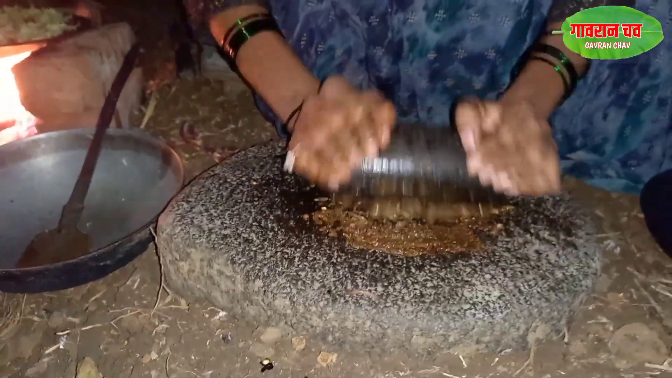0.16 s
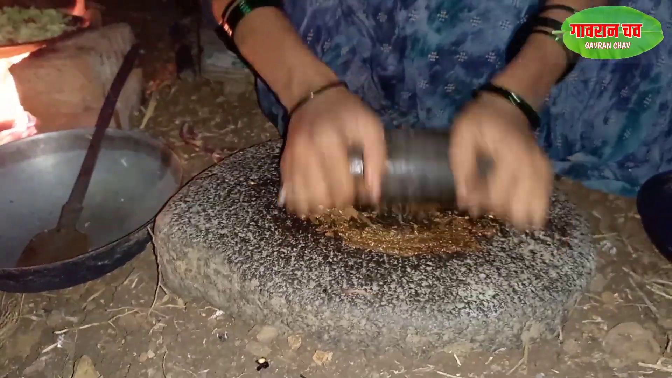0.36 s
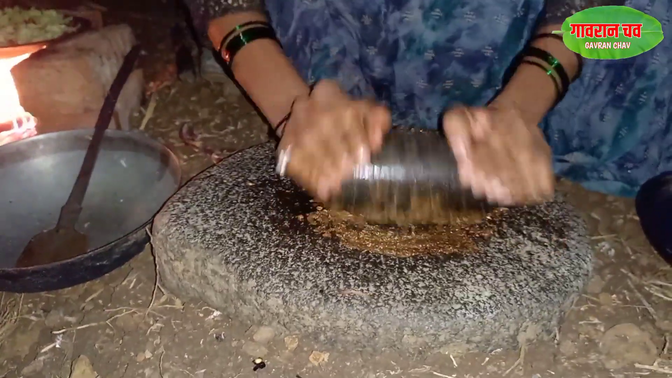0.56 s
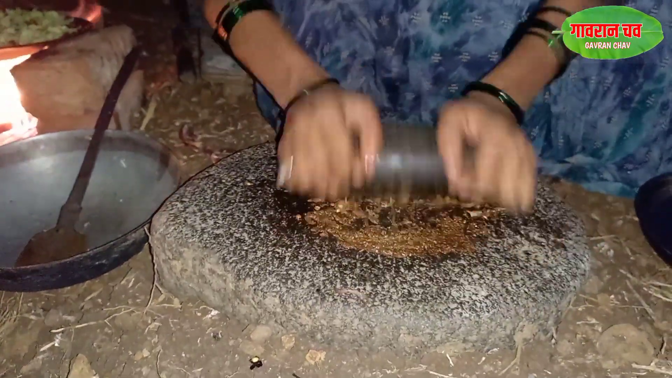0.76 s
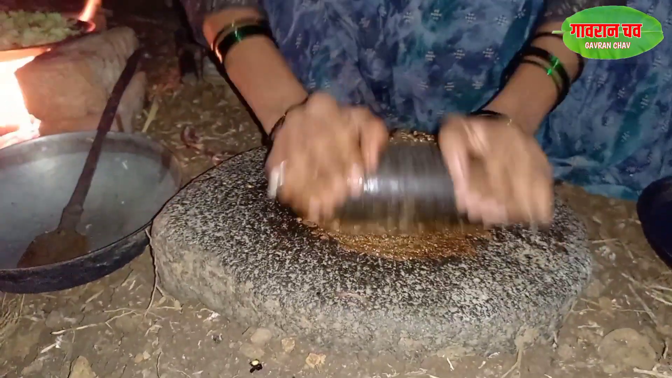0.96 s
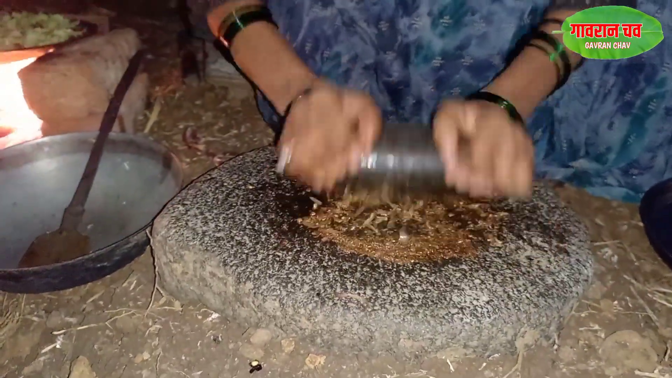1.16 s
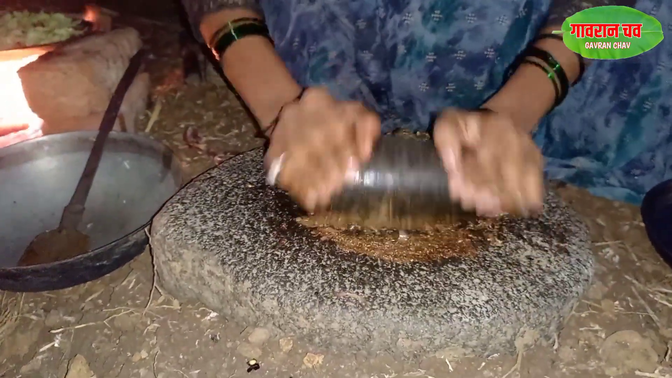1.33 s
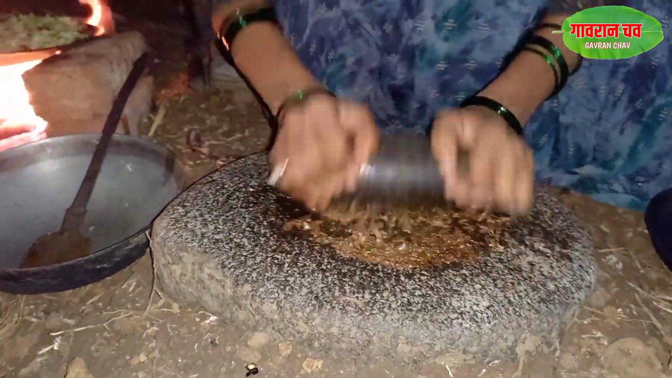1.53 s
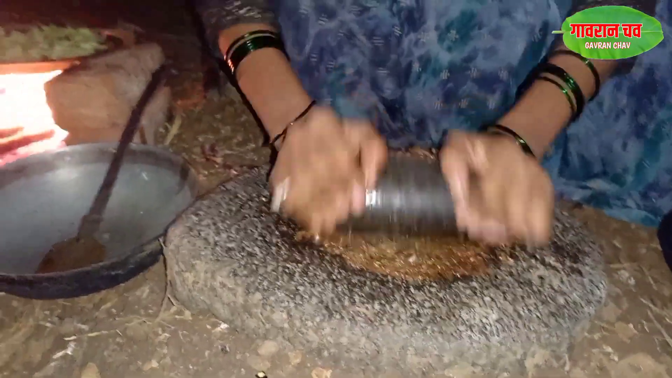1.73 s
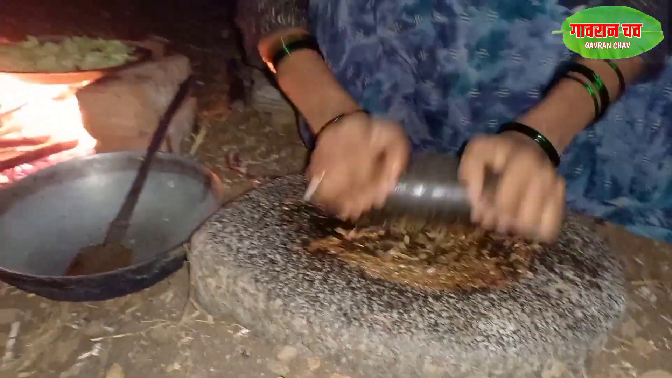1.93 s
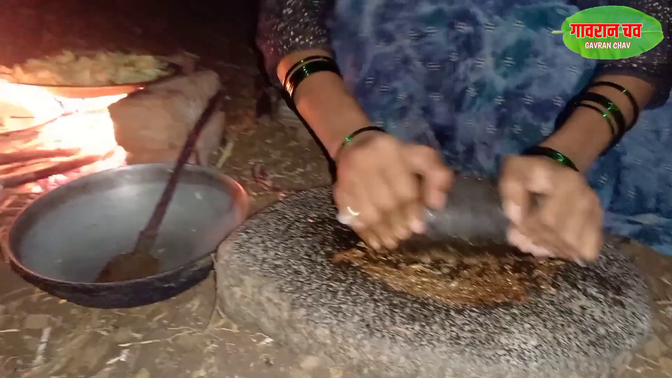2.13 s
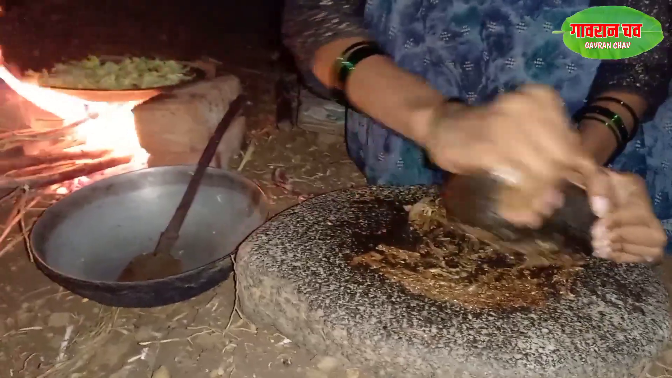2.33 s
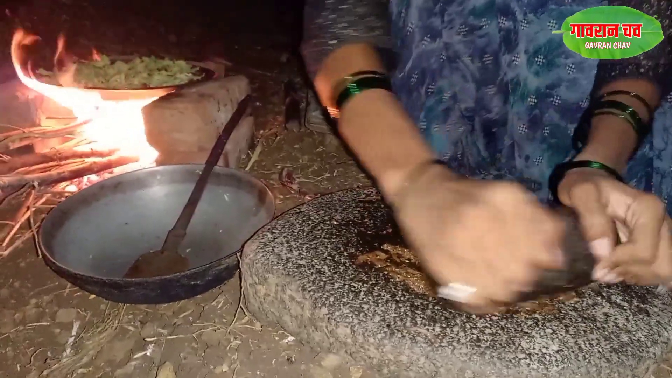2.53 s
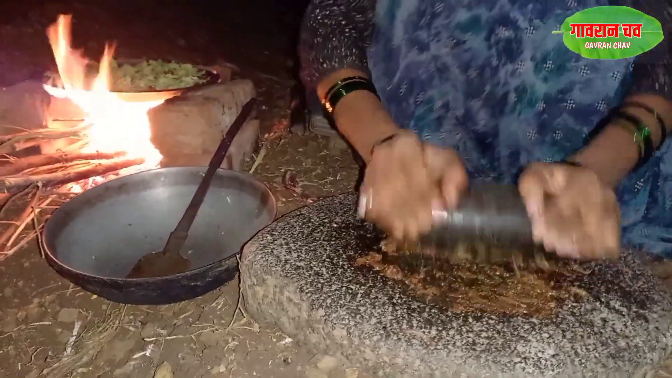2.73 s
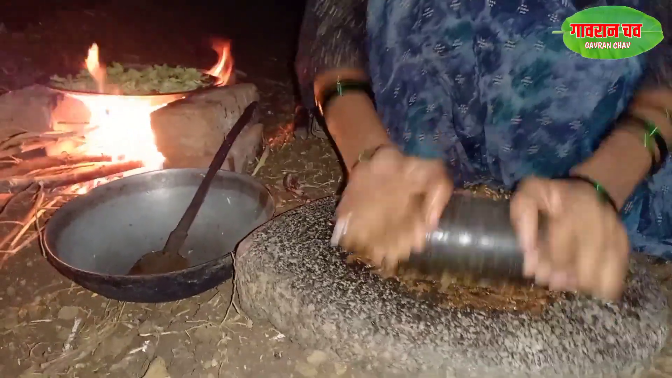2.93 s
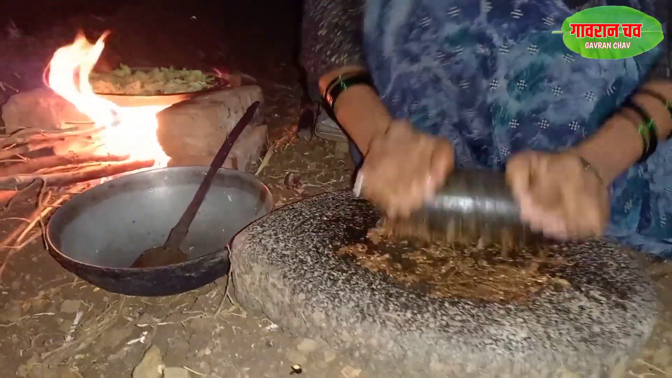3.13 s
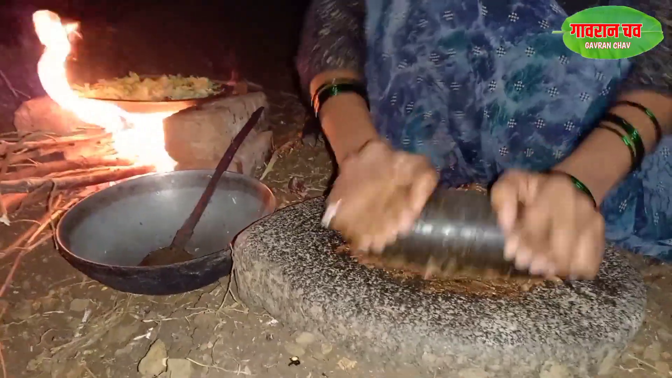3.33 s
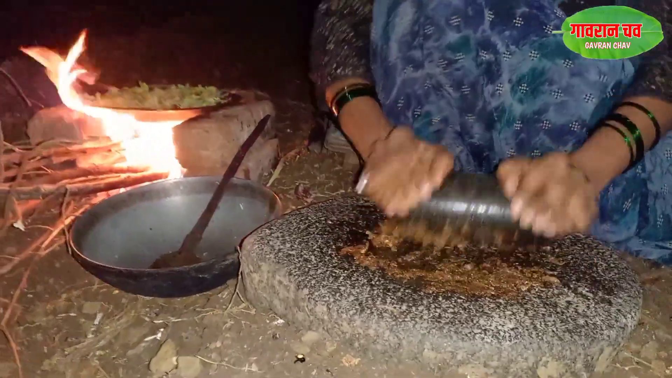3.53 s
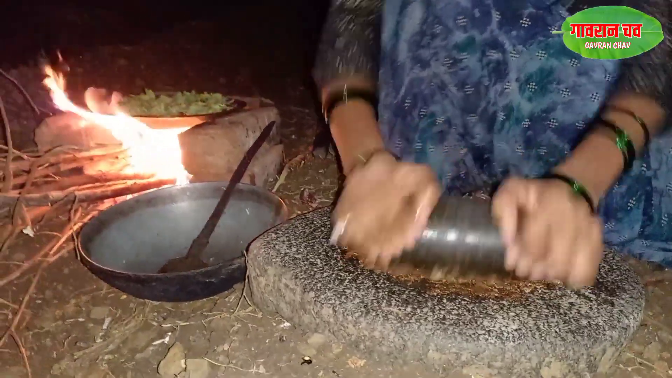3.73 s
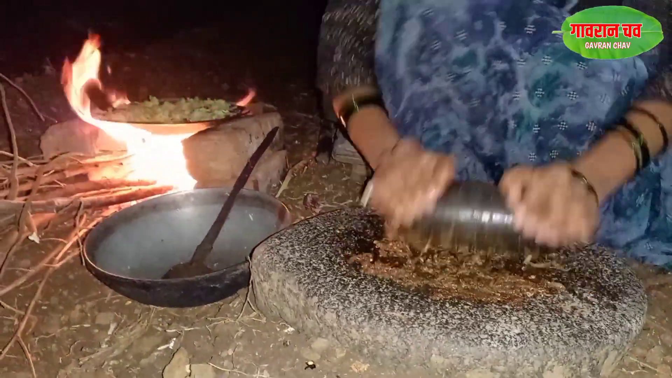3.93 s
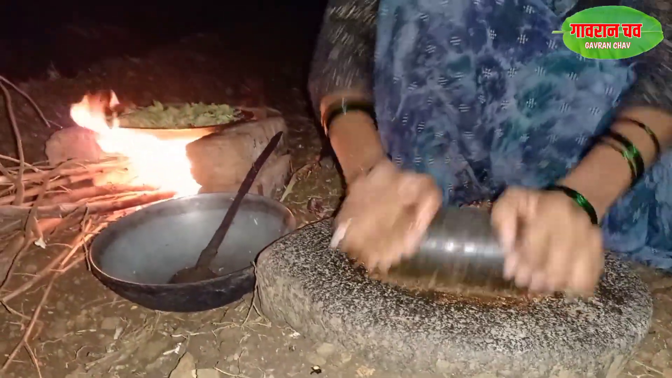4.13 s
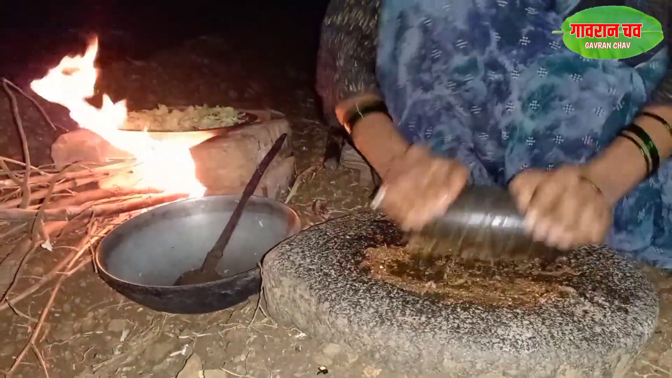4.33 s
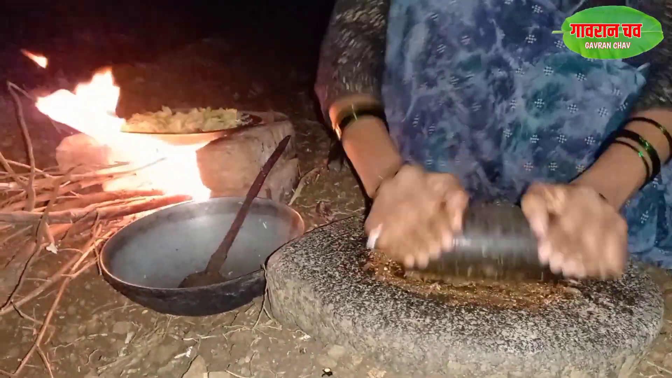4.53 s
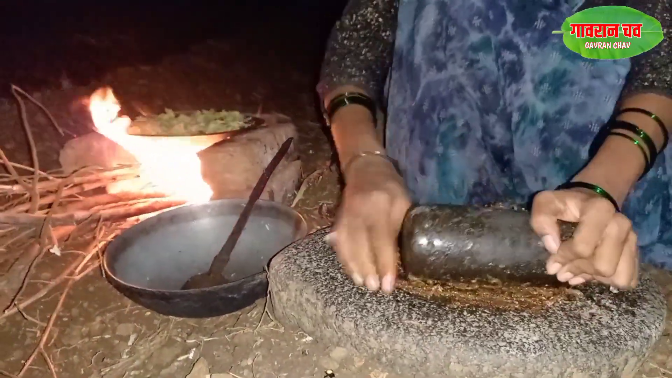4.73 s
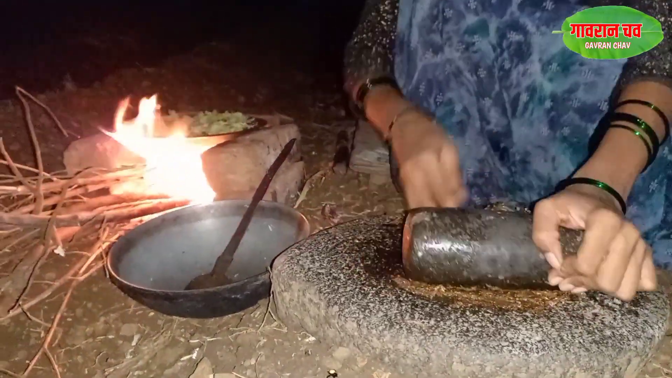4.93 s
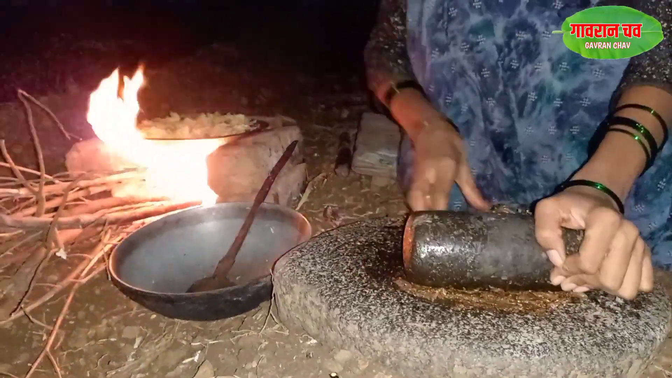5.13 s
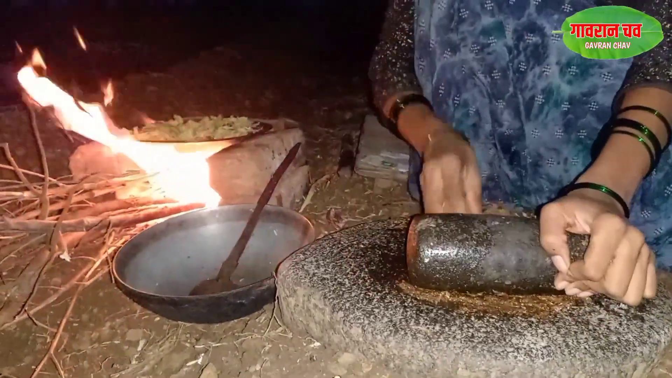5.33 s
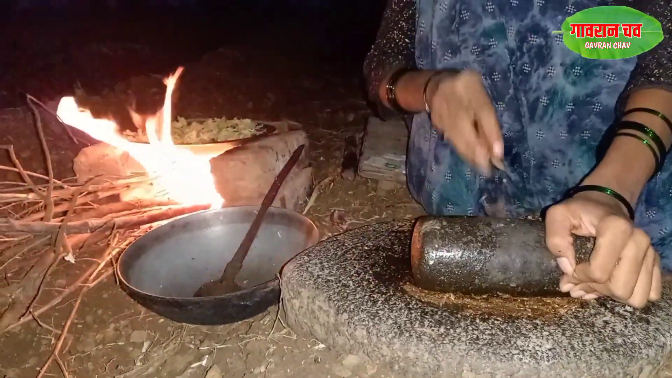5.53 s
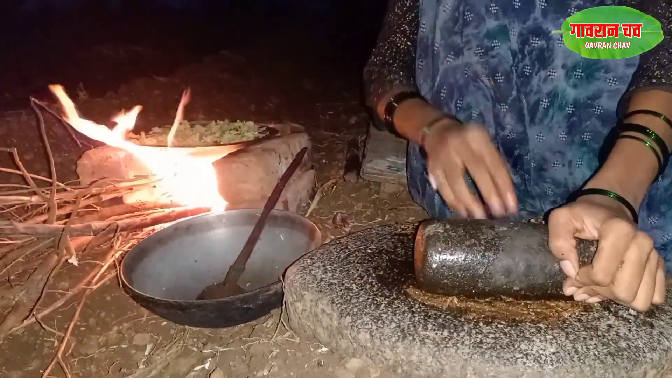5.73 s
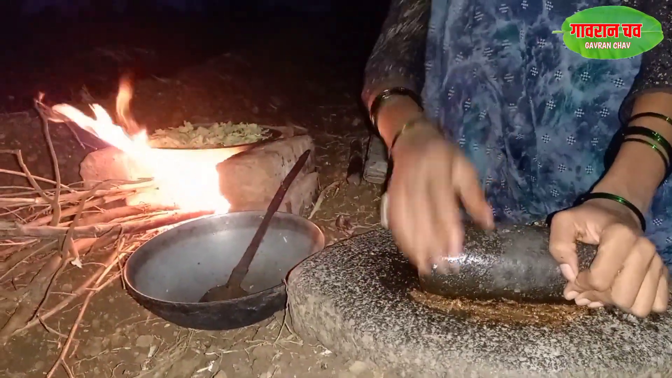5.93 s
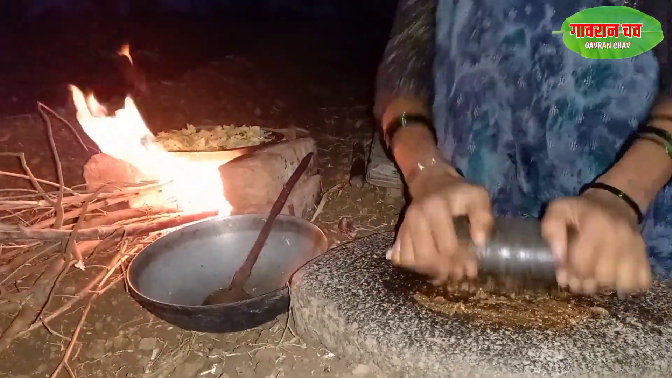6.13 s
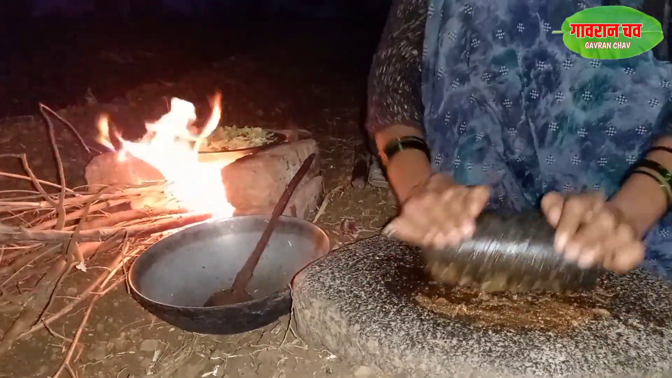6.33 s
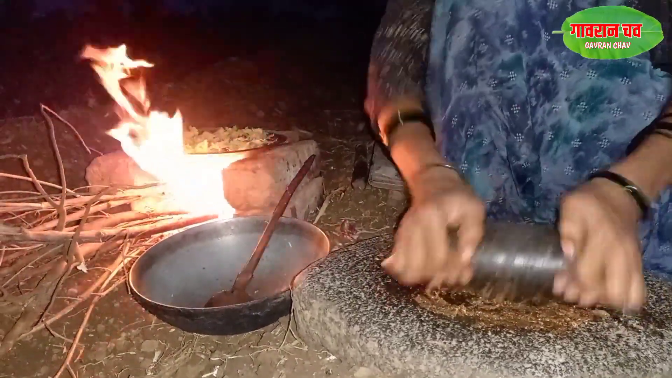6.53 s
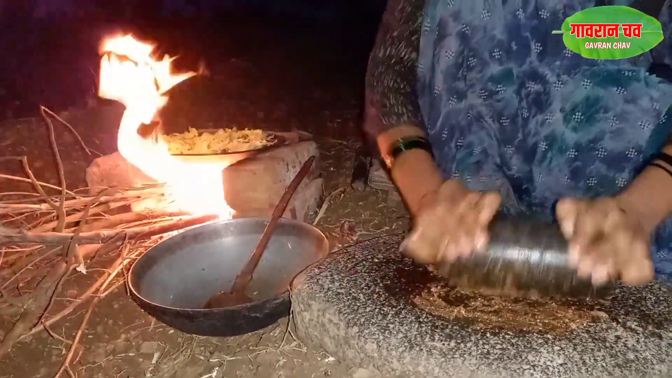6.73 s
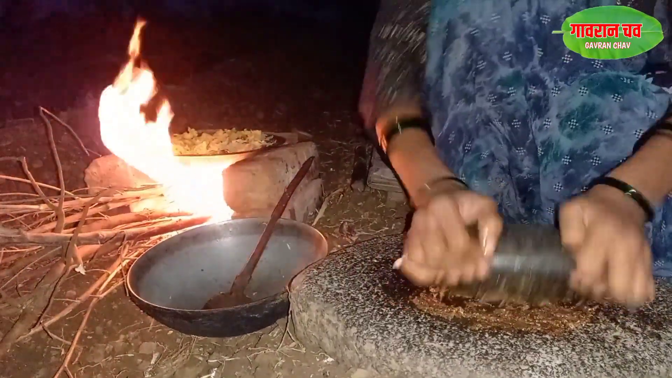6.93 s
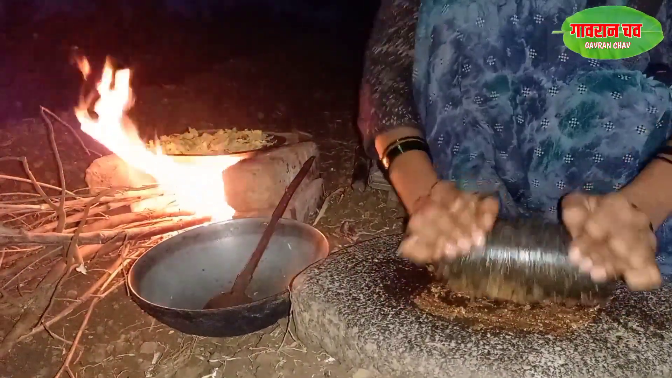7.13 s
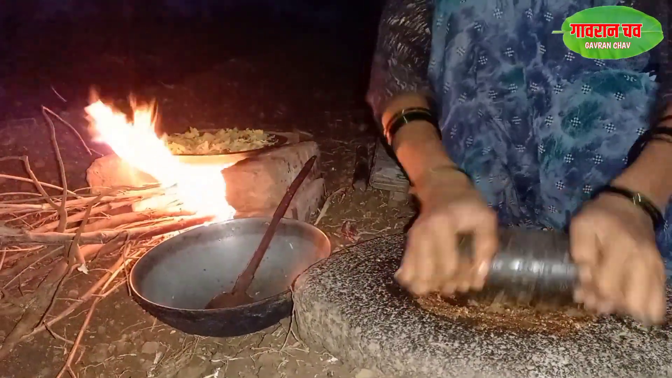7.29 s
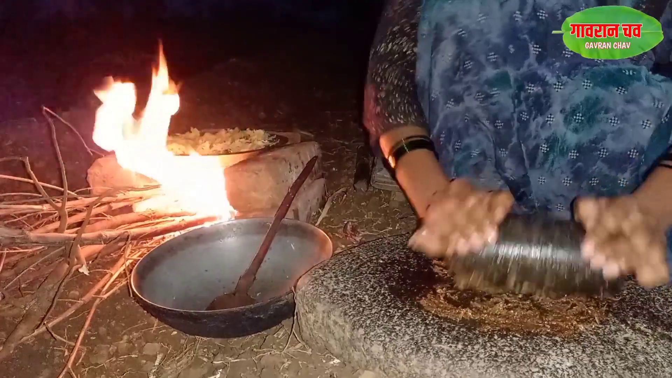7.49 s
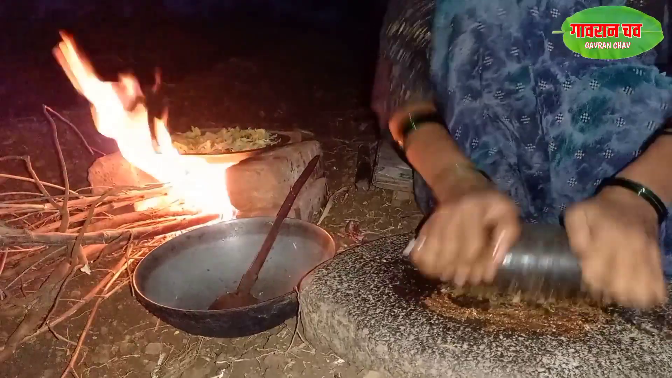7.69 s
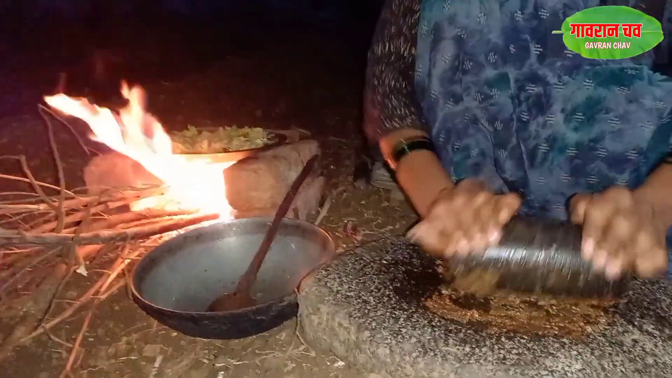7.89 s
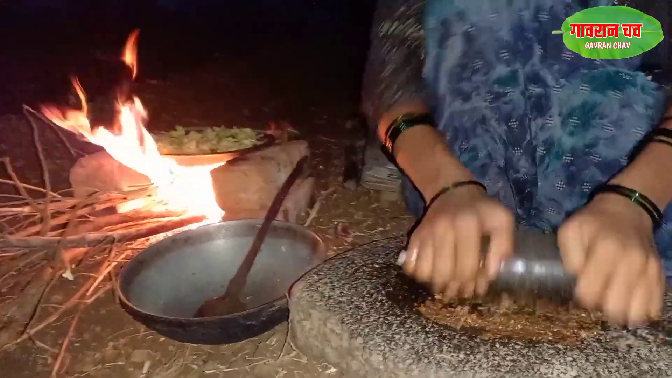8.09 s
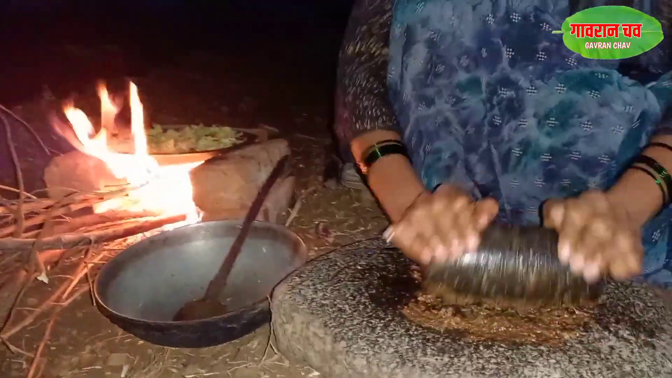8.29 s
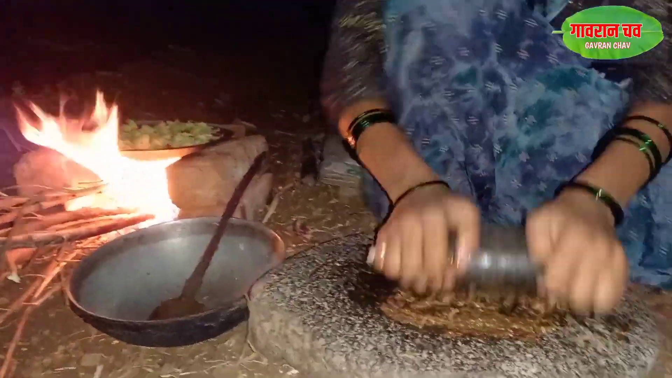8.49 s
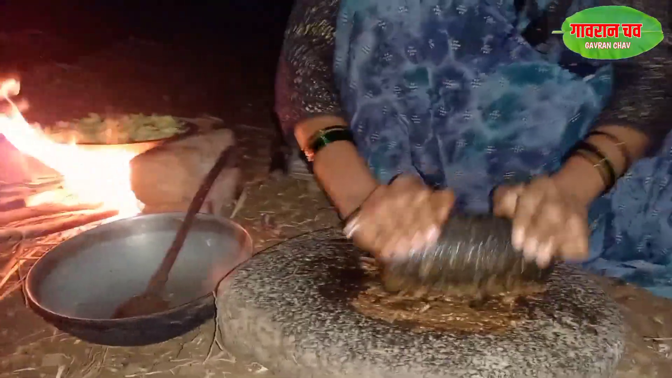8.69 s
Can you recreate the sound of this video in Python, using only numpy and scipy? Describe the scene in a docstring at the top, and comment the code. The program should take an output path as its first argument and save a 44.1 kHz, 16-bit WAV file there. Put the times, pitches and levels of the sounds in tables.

```python
"""Outdoors at night, close microphones: a stone roller is pushed and drawn over spices on a stone slab.
From the start grit crunches with each stroke, dry at first, wetter later, dry again in the last stroke.
Seeds crack, the stones drag, glass bangles clink, a draught buffets the microphones and a fire ticks.
At 2.4 s the roller knocks and is then swivelled. Near 5 s it rests while fingers sweep up the paste;
after 6 s the grinding goes on. Grit is clumped noise bursts, drag and wind filtered noise, bangles sines."""
import sys
import numpy as np
from scipy import signal
from scipy.fft import rfft, irfft, next_fast_len
from scipy.io import wavfile
from scipy.ndimage import uniform_filter1d

SR = 44100
rng = np.random.default_rng(int(sys.argv[2]) if len(sys.argv) > 2 else 0)


def store_pcm(level_fs):
    """Save levels as 16-bit WAV."""
    pcm = np.round(np.clip(level_fs, -1, 1) * 32767).astype(np.int16)
    wavfile.write(sys.argv[1], SR, np.atleast_2d(pcm).T)


N = 385875
TIME = np.arange(N) / SR


def from_db(db):
    """Decibels to gain."""
    return 10 ** (np.asarray(db) / 20)


def rms_one(x):
    """Scale to unit power."""
    return x / np.sqrt(np.mean(x ** 2) + 1e-20)


def in_time(rows):
    """Each column of a curve at every sample."""
    s, *columns = np.transpose(rows)
    return [np.interp(TIME, s, column) for column in columns]


def drift(rate):
    """Slow random curve of spread 1 with `rate` new values a second."""
    values = rng.standard_normal(9000)
    # straight lines between the values lose a third of their power
    return np.interp(TIME * rate, np.arange(9000), values) * np.sqrt(3 / 2)


def swell(s, rise_s, fall_s):
    """One movement or gust, 0-1: a quarter sine up to its top and another back to rest."""
    start, end = np.searchsorted(TIME, [s - rise_s, s + fall_s])
    out, t = np.zeros(N), TIME[start:end] - s
    quarter_s = np.where(t < 0, rise_s, fall_s)
    out[start:end] = np.maximum(np.cos(np.pi / 2 * t / quarter_s), 0)
    return out


def swells(rows):
    """Gain over time of a table of movements."""
    return sum(from_db(db) * swell(s, rise_s, fall_s) for s, rise_s, fall_s, db in rows)


def colour(x, points, share=1):
    """Causal (minimum-phase) filter through a share of the dB values of a spectrum."""
    size = next_fast_len(N + 8192, True)
    hz, db = np.transpose(points)
    grid = np.maximum(np.fft.rfftfreq(8192, 1 / SR), 1)
    curve_db = share * np.interp(np.log(grid), np.log(hz), db)
    cepstrum = irfft(np.log(from_db(curve_db)))
    # folding the cepstrum onto positive time makes the phase minimal
    half = len(cepstrum) // 2
    cepstrum[1:half] *= 2
    cepstrum[half + 1:] = 0
    impulse = irfft(np.exp(rfft(cepstrum)))
    return irfft(rfft(x, size) * rfft(impulse, size), size)[..., :N]


def stereo_noise(alike, size=N):
    """White noise with a given likeness (correlation) of left and right."""
    mid, side = rng.standard_normal((2, size))
    return np.sqrt((1 + alike) / 2) * mid + np.sqrt((1 - alike) / 2) * side * [[1], [-1]]


def add(out, s, sound):
    """Mix a short sound in at a time."""
    start = max(round(s * SR), 0)
    part = sound[..., :max(N - start, 0)]
    out[..., start:start + part.shape[-1]] += part


def snap(t60, scatter_db, scatter_t60, alike):
    """One fracture: a very short burst, then its scatter off hands, slab and ground; unit energy."""
    t = TIME[:2048]
    decay = from_db(-60 * t / t60) + from_db(scatter_db - 60 * t / scatter_t60)
    burst = stereo_noise(alike, size=len(t)) * decay
    return burst / np.sqrt(np.sum(burst ** 2, axis=1, keepdims=True))


def grains(per_s, size_db, clump_db, snaps):
    """Grains of very uneven size break in clumps; each sounds one of the snaps."""
    at = np.flatnonzero(rng.random(N) < per_s / SR)
    level_db = size_db * np.minimum(rng.exponential(1, N), 4.5) + clump_db * drift(130)
    sizes = from_db(level_db) * rng.choice([-1, 1], N)
    kind = rng.integers(0, len(snaps), N)
    clicks = np.zeros((len(snaps), 1, N))
    clicks[kind[at], 0, at] = sizes[at]
    return sum(signal.oaconvolve(train, sound, axes=1)[:, :N] for train, sound in zip(clicks, snaps))


def grit(per_s, size_db, clump_db, t60, scatter_db, alike, count=8):
    """Broad, pitchless fractures."""
    fractures = [snap(t60, scatter_db, 0.078, alike) for _ in range(count)]
    return grains(per_s, size_db, clump_db, fractures)


def grinding():
    """Fine and coarse grit crunch under the roller while the stones drag on each other."""
    # how wet the spice under the roller is: [t/s, wetness 0-1]
    wetness = [(1.7, 0.01), (2.6, 0.18), (6.2, 0.8), (8.3, 0.9), (8.75, 0.15)]
    # colour of the fine crunch: [f/Hz, density level/dB]
    fine_colour = [(3000, -29.5), (5000, -10.5), (6200, -5.5), (7300, 1), (8100, -2), (9000, -1.5),
                   (10300, -1), (12000, -0.5), (13200, -2), (15300, -2.5), (16300, -82.5)]
    # colours of the rasp over dry and wet spice: [f/Hz, density level/dB]
    dry_colour = [(700, -31), (980, -13.5), (1130, -22), (1290, -14.5), (1370, -10), (1560, -19),
                  (1940, -11), (2200, -13), (2700, -12.5), (3500, -6.5), (4500, -1.5), (5500, -1),
                  (6500, -1), (9000, -24.5)]
    wet_colour = [(900, -20.5), (1430, -12), (1700, -11), (2200, -13), (2700, -2), (3090, -2), (3350, 1.5),
                  (3700, 0), (4300, 3), (5070, 2), (5900, 0.5), (9000, -32.5)]
    # colour of stone dragging on stone: [f/Hz, density level/dB]
    stone_colour = [(45, -19), (90, 10), (170, 18.5), (250, 12.5), (350, 6), (500, 0.5), (650, -0.5),
                    (800, -8.5), (1050, -6), (1700, -19.5), (2600, -3), (4500, -47)]

    crunch_gain, rasp_gain, drag_gain = stroke_gains()
    wet = in_time(wetness)[0]
    fine = grit(per_s=5000, size_db=4.0, clump_db=3.0, t60=0.0012, scatter_db=-21.5, alike=0.056)
    fine = rms_one(colour(fine, fine_colour))
    lumps = rms_one(grit(per_s=2400, size_db=2.0, clump_db=2.0, t60=0.0029, scatter_db=-16, alike=0.14))
    husks = rms_one(pips(per_s=500, size_db=4.0, cycles=110, low_hz=2636, high_hz=5950))
    lumps += from_db(-11.5) * husks
    # the rasp sounds in the colour of dry spice, shifting to that of wet spice as the wetness grows
    dry_rasp = from_db(0.98) * rms_one(colour(lumps, dry_colour))
    wet_rasp = rms_one(colour(lumps, wet_colour))
    coarse = np.sqrt(1 - wet) * dry_rasp + np.sqrt(wet) * wet_rasp
    drag = rms_one(colour(stereo_noise(alike=0.88), stone_colour) * from_db(2.4 * drift(70)))
    crunch = fine * crunch_gain * from_db(-2.5)
    rasp = coarse * rasp_gain * from_db(-5.0)
    return crunch + rasp + drag * drag_gain * from_db(6)


def stroke_gains(uneven_db=1.0):
    """Gains of crunch, rasp and drag: each follows the roller's speed over an uneven, lumpy bed of spice."""
    # pushed away, weight on the roller; levels ahead of the layer trims:
    # [fastest t/s, speeding up/s, slowing down/s, fine crunch level/dB, coarse rasp level/dB, drag level/dB]
    pushes = [(.24, 0.087, .15, -35, -31, -55), (.65, 0.088, 0.11, -38, -34, -54.5),
              (1.025, 0.084, 0.11, -39.5, -33, -51), (1.41, .09, 0.13, -37.5, -35, -51.5),
              (1.805, 0.086, .12, -36.5, -36, -49), (2.189, 0.093, 0.076, -42.5, -45.5, -56.5),
              (3.0, .11, 0.094, -41, -44.5, -49), (3.39, 0.12, 0.1, -40.5, -43, -50),
              (3.785, 0.091, 0.13, -41, -47, -50), (4.187, 0.11, 0.12, -41.5, -48, -50.5),
              (4.585, .10, 0.11, -42, -50.5, -51.5), (6.44, 0.1, 0.069, -33, -42.5, -59.5),
              (6.827, 0.059, .115, -40, -43, -53), (7.244, 0.11, 0.12, -39.5, -46.5, -51.5),
              (7.627, 0.13, 0.1, -40, -47.5, -53.5), (8.012, 0.12, 0.12, -42.5, -48, -53),
              (8.40, 0.098, 0.13, -44, -45, -53.5), (8.77, 0.084, .1, -38.5, -38, -44)]
    # drawn back, lightly: same columns
    pulls = [(0.131, 0.046, 0.039, -38.5, -35.5, -64), (0.511, 0.17, 0.11, -44, -37.5, -74),
             (0.891, 0.097, 0.066, -39.5, -36, -81), (1.266, .15, 0.083, -43.5, -37.5, -64.5),
             (1.632, 0.079, 0.14, -38.5, -37, -58.5), (2.03, 0.16, 0.08, -41, -40, -70),
             (2.6, 0.086, 0.18, -43.5, -60, -73), (2.792, 0.12, .12, -38, -42, -73),
             (3.21, 0.1, 0.099, -37.5, -42, -61), (3.605, 0.096, 0.093, -38.5, -46.5, -58),
             (4.004, 0.13, 0.12, -42, -46.5, -61.5), (4.42, 0.1, 0.078, -38, -47.5, -63),
             (6.275, 0.094, 0.14, -42, -48, -78), (6.676, 0.096, 0.16, -45, -46.5, -79),
             (7.08, .08, 0.079, -41.5, -48, -65), (7.44, 0.09, 0.11, -38, -43, -67),
             (7.84, 0.11, 0.1, -43.5, -49.5, -71), (8.216, 0.077, 0.16, -42, -46.5, -62.5),
             (8.626, 0.089, 0.13, -40, -42, -63)]
    # weight left on the roller between strokes, as stirring grit: [t/s, level/dB]
    contact_curve = [(0, -49.5), (1.0, -50), (2.28, -55), (2.42, -72), (2.5, -57), (2.9, -52), (3.6, -54.5),
                     (4.64, -55), (4.77, -71), (4.9, -59.5), (5.13, -75), (5.85, -81), (6.1, -71.5),
                     (6.27, -52), (6.56, -55.5), (7.7, -57), (8.75, -53)]
    # lumps of spice collapse in a short crunch: [t/s, fine crunch level/dB, coarse rasp level/dB]
    lump_falls = [(.015, -44, -54), (0.116, -44, -42), (0.214, -37, -35), (.42, -51, -59),
                  (.622, -31, -31.5), (0.778, -43, -43.5), (1.295, -37, -40), (1.66, -51, -32.5),
                  (1.945, -49, -43.5), (2.028, -42, -36.5), (2.26, -48, -62), (2.46, -55.5, -79),
                  (2.665, -40.5, -61), (3.939, -46, -45), (4.336, -39.5, -52), (4.425, -39, -48.5),
                  (6.425, -30.5, -50), (6.51, -49, -45.5), (6.79, -36, -45), (7.07, -40, -47),
                  (7.655, -39.5, -50.5), (7.841, -41, -58), (8.163, -46, -45.5), (8.535, -43, -58)]
    # exponents: how steeply each layer grows with the roller's speed
    crunch_growth, rasp_growth, drag_growth = 1.63, 1.5, 3
    contact_rasp_db, contact_drag_db = -7.5, -18.5  # relative to the stirring grit
    rest_drag_db = -84  # the hand never holds the roller quite still
    lump_rise_s, lump_fall_s = 0.012, 0.032

    # powers add, so the layers are summed as squares
    contact = from_db(in_time(contact_curve)[0])
    crunch = contact ** 2
    rasp = (contact * from_db(contact_rasp_db)) ** 2
    drag = (contact * from_db(contact_drag_db)) ** 2 + from_db(rest_drag_db) ** 2
    for s, rise_s, fall_s, crunch_db, rasp_db, drag_db in pushes + pulls:
        speed = swell(s, rise_s, fall_s)
        on = speed > 0
        crunch[on] += (from_db(crunch_db) * speed[on] ** crunch_growth) ** 2
        rasp[on] += (from_db(rasp_db) * speed[on] ** rasp_growth) ** 2
        drag[on] += (from_db(drag_db) * speed[on] ** drag_growth) ** 2
    for s, crunch_db, rasp_db in lump_falls:
        collapse = swell(s, lump_rise_s, lump_fall_s) ** 2
        crunch += (from_db(crunch_db) * collapse) ** 2
        rasp += (from_db(rasp_db) * collapse) ** 2
    bed = from_db(uneven_db * drift(45))
    return bed * np.sqrt(crunch), bed * np.sqrt(rasp), np.sqrt(drag)


def pips(per_s, size_db, cycles, low_hz, high_hz, count=12):
    """Husks squeezed out from under the roller ring briefly, each at one of a row of pitches."""
    t = TIME[:512]
    rings = []
    for hz in np.geomspace(low_hz, high_hz, count):
        decay = from_db(-60 * hz * t / cycles)  # a rate of 60 dB in so many cycles
        rings.append(decay * np.sin(2 * np.pi * (hz * t + rng.random((2, 1)))))
    return grains(per_s, size_db, 2.2, rings)


def cracks(onset_s=0.0011):
    """Whole seeds burst with a bright snap."""
    # single seeds, loud and faint; each sounds onset_s later: [t/s, level/dB ahead of gain and colour]
    seeds = [(0.2105, -9), (0.2604, -13), (0.5917, -9), (0.7614, -20), (0.8862, -12), (0.9682, -13.5),
             (1.062, -10.5), (1.2526, -16), (1.359, -19), (1.495, -17), (2.027, -11), (2.031, -8),
             (2.062, -14.5), (2.168, -17.5), (2.351, -22.5), (2.5661, -11), (2.761, -19), (2.9053, -19.5),
             (3.201, -19), (3.6417, -18), (3.9947, -13.5), (4.3883, -15), (4.712, -27), (4.849, -38.5),
             (4.895, -34), (5.011, -37.5), (5.495, -46), (5.9908, -40.5), (6.2303, -18), (6.2533, -14.5),
             (6.275, -12), (6.305, -16.5), (6.401, -20), (6.4157, -13), (6.4545, -8), (6.5104, -16),
             (6.572, -23), (6.7196, -16), (7.2699, -20), (7.4348, -8), (7.4378, -7), (8.1596, -25)]
    bursts = np.zeros((2, N))
    for s, level_db in seeds:
        burst = snap(t60=0.0024, scatter_db=-17.5, scatter_t60=0.029, alike=0.08)
        add(bursts, s + onset_s, from_db(level_db + 10.0) * burst)
    return colour(bursts, [(1500, -30.5), (3500, -19.5), (7000, -3), (10500, 0), (16000, -14.5)])


def pods(t60=0.0068):
    """The hardest pods burst with a snap and a short hollow note."""
    # levels ahead of the colour: [t/s, note level/dB, note f/Hz, snap level/dB]
    pod_bursts = [(0.534, -16, 4430, -13), (.705, -25.5, 3200, -13), (1.022, -15, 5570, -22),
                  (1.257, -14.5, 3840, -18), (2.027, -16, 5430, -14), (6.27, -13, 3370, 7.5),
                  (6.4553, -13.5, 5200, -22)]
    out, t = np.zeros((2, N)), TIME[:2048]
    for s, note_db, hz, snap_db in pod_bursts:
        note = from_db(note_db - 60 * t / t60) * np.sin(2 * np.pi * hz * t)
        burst = snap(t60=0.0013, scatter_db=-22.5, scatter_t60=0.019, alike=0.35)
        add(out, s, note + from_db(snap_db) * burst)
    return colour(out, [(900, -32.5), (2000, -25.5), (3000, -2.5), (6000, -7.5), (10500, 4),
                        (13000, -4.5), (16000, -17)])


def hollow_rub():
    """Swivelled on the slab, the roller sounds in two broad resonances excited by friction noise."""
    # roller resonances: [f/Hz, width/Hz, relative level/dB]
    resonances = [(595, 117, 4), (1720, 310, -5)]
    # swivelling movements: [fastest t/s, speeding up/s, slowing down/s, level/dB]
    swivels = [(2.71, 0.1, 0.29, -62), (3.04, 0.1, 0.097, -55)]
    friction = stereo_noise(alike=0.7)
    tone = np.zeros((2, N))
    for hz, width, db in resonances:
        band = signal.butter(2, [hz - width / 2, hz + width / 2], "band", fs=SR, output="sos")
        tone += from_db(db) * signal.sosfilt(band, friction)
    return rms_one(tone) * swells(swivels)


def knock(s=2.371, peak_db=-47, t60=0.022):
    """The lifted roller touches the slab with a small dull knock."""
    out = np.zeros((2, N))
    add(out, s, snap(t60=t60, scatter_db=-15, scatter_t60=0.066, alike=0.67))
    out = colour(out, [(200, -13), (420, -7), (660, 1), (850, -31), (2500, -39)])
    return out / np.abs(out).max() * from_db(peak_db)


def brush():
    """Fingers sweep the stone with a thin, high swish."""
    # finger movements: [fastest t/s, speeding up/s, slowing down/s, level/dB]
    sweeps = [(5.08, 0.078, .17, -80), (5.36, 0.16, .08, -74.5)]
    swish = colour(stereo_noise(alike=0.36), [(6500, -24), (8200, -3), (8800, -5), (9600, -19.5)])
    return rms_one(swish) * swells(sweeps)


def bangles(bounce_s=0.0056, bounce_db=-7, rise_s=0.00072, count=3):
    """Glass rings touch and rebound; each touch strikes every mode with a strength of its own."""
    # touches: [t/s, level/dB ahead of the mode levels]
    clinks = [(0.0044, -31.5), (0.2927, -31), (0.3481, -40), (0.4027, -20), (0.712, -31), (0.7834, -21),
              (1.0809, -25), (1.1363, -24.5), (1.5374, -29), (1.8806, -22.5), (1.915, -23.5), (1.948, -22),
              (2.2037, -25), (2.2585, -28), (3.0984, -41), (3.4265, -28), (3.834, -23.5), (4.235, -26.5),
              (4.2961, -25.5), (6.4931, -22), (6.8907, -21), (6.9695, -37), (7.3075, -26), (7.3344, -33),
              (7.582, -31), (7.7503, -42), (8.127, -32), (8.5246, -29), (8.714, -26)]
    # modes of the glass: [f/Hz, relative level/dB, t60/s]
    modes = [(7080, -6, .05), (7280, -4.5, 0.046), (11950, -21.5, 0.048), (13500, -7, 0.04),
             (13600, -3.5, 0.039), (14100, -1.5, 0.026)]
    # a harder touch is brighter: the lower modes lose level per dB of strength over a middling touch
    middling_db, lower_modes_db, lower_modes_loss = -25, -14.5, 0.54

    out, t = np.zeros((2, N)), TIME[:SR // 8]
    onset = 1 - np.exp(-t / rise_s)
    for s, touch_db in clinks:
        lower_db = lower_modes_db - lower_modes_loss * (touch_db - middling_db)
        delays = np.arange(count) * bounce_s * rng.uniform(0.65, 1.1)
        for k, delay in enumerate(delays):
            for hz, mode_db, t60 in modes:
                level_db = touch_db + mode_db + k * bounce_db + rng.normal(0, 1.4)
                level_db += (hz < SR / 4) * lower_db
                phase = 2 * np.pi * (hz * rng.normal(1, 0.0024) * t + rng.random((2, 1)))
                add(out, s + delay, onset * from_db(level_db + 1.5 - 60 * t / t60) * np.sin(phase))
    return out


def draught(buffet_t60=0.051, rise_s=0.0023):
    """Moving air rumbles at each microphone port, partly alike, now and then with a sharp buffet."""
    # colour of the wind rumble: [f/Hz, density level/dB]
    rumble_colour = [(36, -36.5), (52, -9.5), (70, -0.5), (92, -1), (125, -1), (170, -13), (250, -22),
                     (400, -38), (800, -60)]
    # low buffets: [t/s, level/dB ahead of gain and panning, f/Hz, left minus right level/dB]
    buffets = [(2.196, -25, 114, 24), (2.858, -29, 102, 27), (2.954, -29.5, 130, 21),
               (3.019, -32.5, 138, 24), (3.72, -33.5, 274, -25), (3.743, -19, 95, -1),
               (3.747, -30, 240, -25), (3.784, -29.5, 192, -24), (3.83, -26, 220, -18),
               (3.854, -18, 103, -10), (3.854, -30, 294, -18), (3.922, -32.5, 157, -28),
               (5.723, -38.5, 147, 24)]
    eddies = colour(stereo_noise(alike=0.3), rumble_colour)
    # eddies of even strength, so that the gusts alone shape the level
    eddies /= np.sqrt(uniform_filter1d(eddies ** 2, size=2600) + 1e-20)
    out = eddies * wind_gain() * from_db(-1.0)
    t, ears = TIME[:SR // 4], np.array([[0.5], [-0.5]])
    onset = 1 - np.exp(-t / rise_s)
    for s, level_db, hz, side_db in buffets:
        decay = from_db(level_db + 5.5 - 60 * t / buffet_t60)
        thud = np.sin(2 * np.pi * hz * t) * decay * onset
        add(out, s, thud * from_db(ears * side_db - 0.23 * abs(side_db)))
    return out


def wind_gain():
    """Strength of the air at each port: the gusts add their power to the breeze."""
    # steady draught, ahead of the rumble's trim: [t/s, left level/dB, right level/dB]
    breeze = [(0, -55, -65), (.35, -50.5, -51), (.65, -53.5, -51), (1.0, -51, -45.5), (2.0, -54, -44),
              (2.25, -53, -62), (2.8, -56, -62), (3.1, -48, -40.5), (3.52, -52.5, -54), (4.3, -53, -50.5),
              (4.8, -57, -61), (5.12, -70.5, -74.5), (5.55, -54, -59), (6.3, -56, -58.5), (7.1, -56.5, -57),
              (7.85, -54.5, -54.5), (8.3, -51.5, -47.5), (8.6, -57, -60.5)]
    # gusts on top of it: [strongest t/s, rise/s, fall/s, left level/dB, right level/dB]
    gusts = [(.03, 0.081, 0.091, -36, -62), (.4, 0.15, 0.14, -53, -41.5), (1.03, 0.092, 0.059, -41, -49),
             (1.82, 0.095, 0.049, -50, -60), (2.07, 0.097, 0.042, -35.5, -50), (2.22, 0.056, 0.1, -43, -62),
             (2.439, 0.089, 0.039, -35, -66), (2.579, 0.098, .11, -41, -49), (2.87, 0.095, 0.14, -31, -63),
             (3.02, 0.13, .09, -32, -51), (3.33, 0.097, 0.036, -41.5, -57),
             (3.43, 0.028, 0.056, -39.5, -51), (3.759, 0.2, 0.4, -41, -31.5),
             (4.26, 0.11, 0.21, -39.5, -62), (4.51, 0.16, 0.1, -43.5, -37), (4.89, 0.21, 0.17, -46, -71),
             (5.46, 0.026, 0.085, -47.5, -68), (5.755, 0.052, 0.039, -38, -61),
             (5.95, 0.041, 0.058, -51.5, -68), (6.12, 0.031, .05, -47.5, -67),
             (6.78, 0.052, 0.038, -39, -62), (6.88, 0.046, 0.047, -49, -45.5),
             (7.11, 0.091, 0.22, -46, -49), (7.66, 0.046, 0.087, -52, -50), (8.15, 0.26, 0.12, -42, -46),
             (8.76, 0.13, .1, -50, -37)]
    power = from_db(in_time(breeze)) ** 2
    for s, rise_s, fall_s, left_db, right_db in gusts:
        strength = swell(s, rise_s, fall_s) ** 1.5
        power += (from_db([[left_db], [right_db]]) * strength) ** 2
    return np.sqrt(power)


def hearth():
    """Burning sticks tick faintly, a little to the left: sparse, clumped fractures."""
    ticks = grit(per_s=57, size_db=3, clump_db=7, t60=0.002, scatter_db=-16, alike=0.34, count=4)
    ticks = rms_one(colour(ticks, [(1500, -18.5), (6000, 1.0), (14000, 5)]))
    return ticks * from_db([[-79], [-81]])


def night_air(level_db=-67):
    """Quiet outdoor air: steady coloured noise, nearly independent at the two microphones."""
    # colour of the air: [f/Hz, density level/dB]
    air_colour = [(30, -1), (90, 15.5), (250, -3), (600, -13), (2000, -16), (4500, -31), (5200, -10.5),
                  (6100, -19), (7500, -12), (9500, -38), (15500, -21)]
    return from_db(level_db) * rms_one(colour(stereo_noise(alike=0.088), air_colour))


def from_the_slab(sound, left_lag_s=0.000045):
    """The slab is nearer the right microphone: the left one hears it later and in another colour."""
    # side tilt, split unevenly between the microphones: [f/Hz, left minus right level/dB before the shares]
    side_tilt = [(70, -1), (600, 0.5), (1300, -1), (1950, 1.5), (2800, -0.5), (4500, -5), (6000, -2),
                 (7400, -7.5), (8100, -3), (10300, -9.5), (13000, -5), (15500, -1.5)]
    left, right = sound
    left = np.interp(TIME - round(left_lag_s * SR) / SR, TIME, left)
    return np.array([colour(left, side_tilt, share=0.54), colour(right, side_tilt, share=-0.65)])


def scene():
    """The slab lies a little to the right, the fire to the left, in quiet night air."""
    near = grinding() + cracks() + pods() + hollow_rub() + knock() + brush() + bangles()
    return from_the_slab(near) + draught() + hearth() + night_air()


def record(dry, cutoff_hz=16300):
    """The microphone drops the deepest bass; the top is cut steeply."""
    bass_cut = signal.butter(4, 48, "high", fs=SR, output="sos")
    top_cut = signal.ellip(10, 0.2, 80, cutoff_hz, fs=SR, output="sos")
    return signal.sosfilt(top_cut, signal.sosfilt(bass_cut, dry))


dry = scene()
out = record(dry)
store_pcm(out)
```